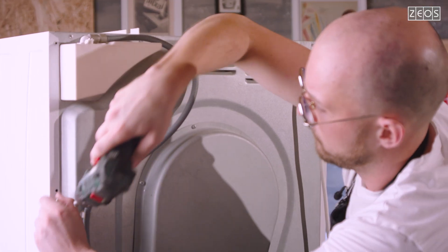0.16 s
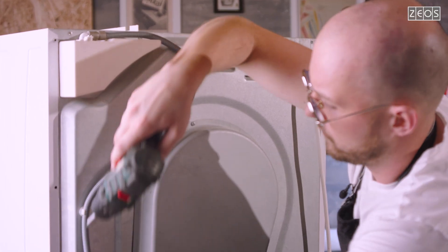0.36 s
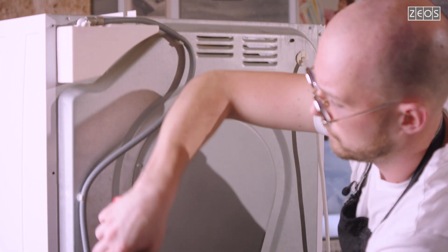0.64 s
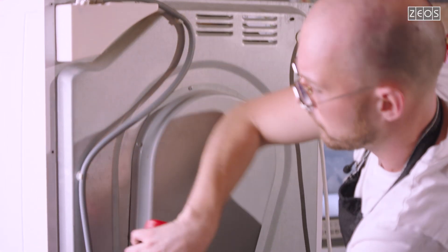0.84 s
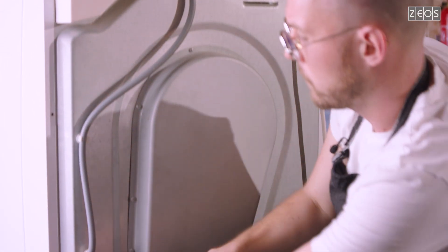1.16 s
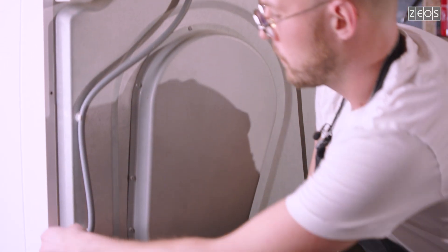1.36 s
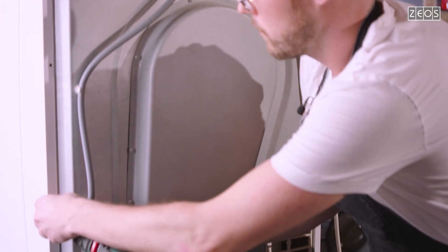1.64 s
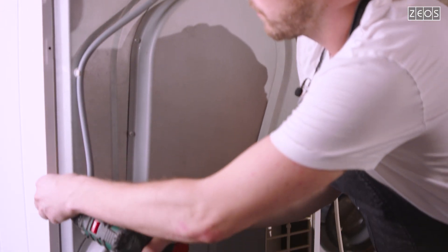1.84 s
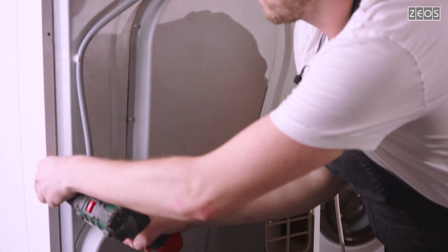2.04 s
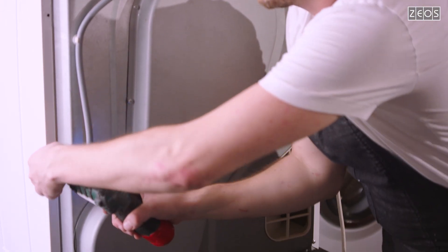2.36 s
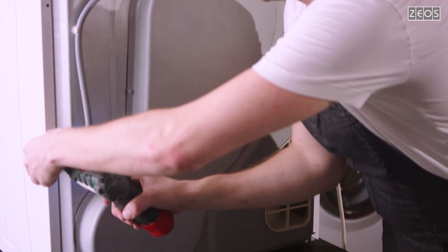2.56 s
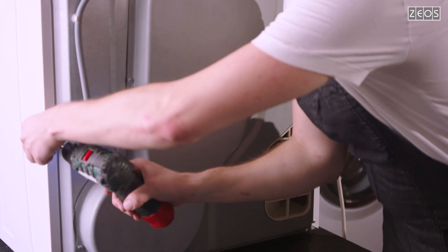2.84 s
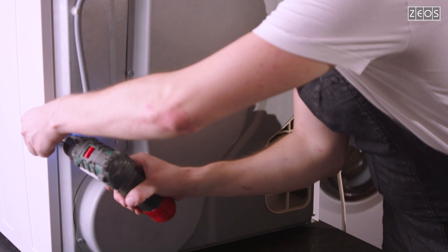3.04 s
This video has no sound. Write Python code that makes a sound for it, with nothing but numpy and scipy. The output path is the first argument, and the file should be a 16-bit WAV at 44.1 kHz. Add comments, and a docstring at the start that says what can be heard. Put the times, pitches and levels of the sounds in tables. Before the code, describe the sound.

A cordless drill is already whirring, gritty and bright, and dies away by about 0.3 s. Quiet room air and faint hum remain, with soft rustle, sparse ticks and a sharp ringing metallic click at 1.2 s. Light panel knocks and clicks follow from 1.4 to 2.2 s. At 2.25 s a hard clunk and thin high whine start the drill; it dips, then runs with rising gear whirr and panel rattle until cut off at 3.2 s.

```python
"""In a workshop, a cordless drill backs screws out of a sheet-steel appliance panel: one burst dies away, the tool is
moved and seated with clicks and knocks, then it whines, bites and runs. Motor, air and rustle are coloured noise;
gear teeth, whine, whistle and hum are sine waves; the panel is a set of ringing modes; clicks are short noise bursts.
The clicks and the rougher whine get a near echo and a room tail. Both channels carry the same mono sound."""
import sys
import numpy as np
from scipy import signal
from scipy.fft import rfft, irfft, next_fast_len
from scipy.io import wavfile
from scipy.ndimage import uniform_filter1d, map_coordinates

SR = 44100
rng = np.random.default_rng(int(sys.argv[2]) if len(sys.argv) > 2 else 0)


def store_wav(level_fs):
    """Save 16-bit WAV to argv[1]."""
    pcm = np.round(np.clip(np.atleast_2d(level_fs), -1, 1) * 32767)
    wavfile.write(sys.argv[1], SR, pcm.T.astype(np.int16))


def ratio_of_db(decibels):
    """Turn decibels (scalar or array-like) into linear amplitude factors; 0 dB maps to 1."""
    return 10 ** (np.asarray(decibels, float) / 20)


N = 141120
T = np.arange(N) / SR  # time of each sample [s]

# All noise colours below are relative: the noise is scaled to its own level afterwards.
# motor bursts, one list each: (time [s], relative level of gear and brush noise [dB], treble boost [dB])
MOTOR_BURSTS = [
    [(0.0, -31.5, 2), (0.092, -33, -3), (0.228, -43.5, -7.5), (0.306, -55.5, -13), (0.45, -69, -23)],
    [(2.2, -64, 9), (2.216, -56.5, -1), (2.264, -31, -5), (2.316, -34.5, -5.5), (2.342, -33.5, -3),
     (2.47, -39, -8.5), (2.534, -32, -0.5), (2.684, -31.5, 3), (2.698, -31.5, 1.5), (2.988, -33, 2.5),
     (3.2, -35, 5)],
]
# gear teeth meeting: (time [s], teeth per second [Hz], relative level [dB], tilt [dB per multiple])
TOOTH_MESH = [(2.48, 880, -70, 3), (2.53, 980, -52, 3), (2.6, 1065, -47, 4.5), (2.63, 1115, -48, 3.5),
              (2.67, 1190, -45, 3.5), (2.71, 1210, -56, 3), (2.94, 1212, -54, 2), (2.98, 1212, -42, -3),
              (3.1, 1215, -43, -3), (3.2, 1220, -54, 0)]
# multiples of the tooth rate: (multiple, level before the tilt [dB])
TOOTH_MULTIPLES = [(1, -14), (2, -1), (3, -3), (4, -4)]
# multiples of the shaft's turning rate: (multiple, level against the gear noise [dB])
SHAFT_MULTIPLES = [(1, -18), (2, -13), (3, -15)]
# resonances of the drill housing: (pitch [Hz], width [Hz], relative level [dB])
HOUSING_RESONANCES = [(2144, 38, 7), (3320, 35, -8), (3620, 57, -22), (4550, 48, 17), (4720, 84, -4),
                      (5730, 370, 15.5), (6300, 43, -20), (6980, 105, 9), (8150, 54, 8)]
# colour of the gear noise: (frequency [Hz], level per Hz [dB])
GEAR_COLOUR = [(410, -42), (700, -6), (958, -6), (1640, -6), (2160, -4), (2660, -4.5), (3070, -2),
               (3840, -3), (6400, -2.5), (13000, -20), (16000, -27.5)]

# the panel shaken by tool and hands: (time [s], relative level [dB], low part over high part [dB])
PANEL_SHAKES = [
    [(0.0, -34.5, 6), (0.09, -34, -1), (0.192, -48.5, 3.5), (0.476, -63, 0), (0.5, -62, -8)],
    [(1.435, -59, 2), (1.465, -46.5, -7), (1.599, -60.5, 6), (1.623, -63, 5), (1.7, -59, 0)],
    [(1.74, -68, 1), (1.75, -59, 0), (1.808, -57, 11.5), (1.876, -62.5, 22.5), (1.892, -49, 10),
     (2.154, -50, -0.5), (2.172, -43.5, 3.5), (2.234, -44.5, 6), (2.245, -35, -3)],
    [(2.275, -18, 1), (2.293, -27.5, -3.5), (2.451, -35.5, 6.5), (2.521, -33.5, -5), (3.047, -30, -1.5),
     (3.059, -39, -10), (3.085, -27.5, 1), (3.155, -35, 4), (3.2, -27, -3)],
]
# ringing modes of the panel: (pitch [Hz], width [Hz], relative level [dB])
PANEL_MODES = [(109, 12, -12.5), (158.1, 13.2, -2), (205, 15.4, 1.5), (275.7, 40, -5.5),
               (363.3, 18.8, -3.5), (400, 20, -3.5), (447, 32, -3.5), (577.2, 29, -3), (665.7, 21.8, -4),
               (803, 67, -10), (1035.4, 26, -9.5), (1256, 40, -14)]
# colour of the panel's duller noise: (frequency [Hz], level per Hz [dB])
PANEL_COLOUR = [(15, -56), (25, -4.5), (202, -10.5), (316, -6.5), (368, 0.5), (659, -11), (718, -23),
                (1500, -15.5), (1950, -52), (3300, -120)]
# the running bit favours some modes: (time [s], favoured pitch [Hz], boost [dB])
FAVOURED_MODES = [(2.47, 670, -4), (2.52, 674, 11), (2.63, 670, 7.5), (2.66, 377, 10.5), (2.92, 380, 6),
                  (3.0, 640, 1), (3.05, 625, 3.5)]
# knocks on the panel: (time [s], relative peak [dB], centre of the modes struck [Hz])
PANEL_KNOCKS = [(0.072, -24, 184), (0.837, -37, 660), (1.435, -38, 210), (1.459, -36, 205),
                (1.463, -37, 450), (1.789, -39.5, 200), (1.795, -38.5, 586), (1.885, -30.5, 378),
                (1.929, -34, 600), (1.968, -31, 205), (2.028, -40, 600), (2.056, -35, 810),
                (2.082, -36, 420), (2.168, -27, 353), (2.247, -18, 237), (2.259, -5, 590),
                (2.312, -17, 150), (2.452, -25, 385), (3.075, -18, 198)]

# colour of the room air: (frequency [Hz], level per Hz [dB])
AIR_COLOUR = [(12, -16), (20, -3), (116, -9.5), (357, -9.5), (624, -13), (825, -18.5), (1090, -22.5),
              (1190, -23), (1570, -23), (2670, -27.5), (16000, -36)]
# mains hum: (pitch [Hz], average level [dB])
MAINS_HUM = [(50, -67), (100, -73.5), (200, -76)]
# clicks of bit, chuck and screw:
# (time [s], relative peak [dB], main pitch [Hz], broad crack [dB], time for the decay to reach -20 dB [s])
TOOL_CLICKS = [(0.08, -23, 14500, 8, 0.0057), (0.8397, -37, 1520, -16, 0.0054),
               (0.846, -30.5, 7160, -7, 0.0035), (0.9587, -33.5, 2140, 2, 0.0039),
               (1.078, -29.5, 4970, 10, 0.0038), (1.2331, -11, 4550, 2, 0.0037),
               (1.4328, -35, 1574, 1, 0.0025), (1.627, -42.5, 6900, 6, 0.005), (1.929, -37, 1820, 2, 0.011),
               (1.988, -50, 1960, 5, 0.0034), (2.025, -27, 2290, 10, 0.0074),
               (2.162, -35.5, 2540, -6, 0.0048), (2.2618, -14.5, 1800, -6, 0.0068)]
# colour of the broad crack in a click: (frequency [Hz], level [dB])
CRACK_COLOUR = [(240, -46), (400, -15), (2250, 0.5), (3990, -5), (4580, -0.5), (5780, -9), (7400, -5.5),
                (10400, -16), (11800, -14.5), (16000, -22)]
# dull far thuds: (time [s], relative level [dB], pitch [Hz])
FAR_THUDS = [(0.613, -45, 102), (1.04, -44.5, 93)]
# cloth and hands rustle, one list per spell: (time [s], level [dB])
RUSTLE_SPELLS = [
    [(0.74, -71), (0.848, -65.5), (0.972, -55.5), (1.178, -53), (1.23, -67)],
    [(1.436, -45), (1.582, -69.5), (1.75, -85)],
    [(1.92, -72), (1.978, -56), (2.104, -61), (2.2, -58)],
]
# colour of the rustle: (frequency [Hz], level per Hz [dB])
CLOTH_COLOUR = [(180, -36), (300, -7), (418, -5), (455, -4), (1970, -7), (3700, -13.5), (5340, -11.5),
                (16000, -25.5)]
# the hardest click sets a steel part ringing: (time [s], level [dB])
STEEL_START = (1.236, -44)
# a faint high whistle: (time [s], pitch [Hz], level [dB])
WHISTLE_PATH = [(1.36, 11550, -95), (1.39, 11450, -77), (1.43, 11350, -77.5), (1.49, 11300, -72.5),
                (1.52, 11700, -74), (1.55, 11100, -82), (1.58, 9600, -73), (1.62, 8300, -89)]
# rough speed-control whine, one list per spell: (time [s], pitch [Hz], relative level [dB])
ROUGH_WHINE = [
    [(2.198, 6580, -53), (2.216, 5900, -38), (2.23, 5680, -34), (2.244, 5620, -26), (2.252, 5655, -38)],
    [(2.265, 6330, -38), (2.283, 6050, -39), (2.305, 6490, -47), (2.317, 6020, -38), (2.35, 5930, -48)],
    [(2.463, 5630, -39), (2.473, 5870, -35.5), (2.493, 5670, -31), (2.55, 5668, -30.5), (2.562, 5770, -40)],
    [(2.705, 5949, -43), (2.711, 5825, -34), (2.723, 5630, -30.5), (2.743, 5820, -34), (2.76, 5820, -44)],
]
# steadier spells of the whine: (time [s], pitch [Hz], level [dB])
STEADY_WHINE = [
    [(2.4, 7250, -52), (2.41, 7230, -45), (2.44, 7050, -48), (2.462, 6300, -48)],
    [(2.865, 6290, -39), (2.91, 6340, -38.5), (2.995, 6360, -39)],
    [(3.15, 6260, -37), (3.2, 6320, -38)],
]
# how long the room rings: (frequency [Hz], time to fall 60 dB [s])
ROOM_DECAY = [(200, 1), (1500, 0.51), (4800, 0.35), (9000, 0.43), (15000, 0.45)]

TEETH = 6  # on the motor pinion
SHAFT_DEPTH = 0.25  # pulsing once a turn, as a share of the noise
RATTLE_PER_S, RATTLE_DB = 900, -9  # grit in the gear noise
MESH_BLUR, MOTOR_UNEVEN_DB = 0.0025, 0.7  # pitch blur as a share, size of random level changes
HOUSING_DB = -3.5  # resonances against the plain gear noise
BODY_DB, SPLIT_HZ = -9, 260  # dull panel noise, border between low and high part
FAVOURED_OCTAVES = 0.18  # how far from the favoured pitch the boost spreads
LURCH_DB, MODE_SCATTER_DB = 1.2, 2  # random changes of shaking, of each struck mode
KNOCK_DAMPING = 0.75  # how fast a struck mode dies, against what its width says
SPREAD_OCTAVES, SPREAD_PER_DB = 0.95, 0.014  # reach at 0 dB; softer knocks reach fewer modes
THUD_S = 0.083  # time for the decay to reach -60 dB
AIR_DB = -57
CLICK_Q = 4  # higher means a narrower pitch
RUSTLE_UNEVEN_DB = 1.2
SCRAPES_PER_S, SCRAPE_DB = 250, -7  # tiny ticks in the rustle
STEEL_HZ, STEEL_WIDTH_HZ, STEEL_T60_S = 4800, 450, 0.4
OCTAVE_DB, ROUGH_WAVER_HZ, ROUGH_FLUTTER_DB = -31, 70, 3.5
STEADY_WAVER_HZ, STEADY_FLUTTER_DB = 12, 2
ECHO_S, ECHO_DB, ROOM_DELAY_S = 0.0047, -3, 0.009
CLICK_ROOM_DB, WHINE_ROOM_DB = -6.5, -14  # how loud the room tail is
TOP_HZ = 15850  # nothing is kept above this


def unit(x):
    """Scale to an average (rms) level of 1."""
    return x / np.sqrt(np.mean(x ** 2) + 1e-20)


def along(points, hz):
    """Read a (frequency, value) curve, with frequency on a log axis."""
    f, v = np.transpose(points)
    return np.interp(np.log(hz + 1), np.log(f + 1), v)


def spells(tables, fade_db_per_s=4000):
    """Turn tables into curves over time, plus a gain that falls away quickly outside each table."""
    rows = np.concatenate(tables)
    away = np.min([np.maximum(np.maximum(t[0][0] - T, T - t[-1][0]), 0) for t in tables], axis=0)
    curves = [np.interp(T, rows[:, 0], column) for column in rows.T[1:]]
    return curves, ratio_of_db(-fade_db_per_s * away)


def wobble(rate):
    """A smooth random curve through `rate` random points a second."""
    return map_coordinates(rng.standard_normal(int(N * rate / SR) + 4), [T * rate])


def filtered(x, response):
    """Multiply the spectrum of x by a response that depends on frequency."""
    m = next_fast_len(len(x) + SR // 2)
    return irfft(rfft(x, m) * response(np.fft.rfftfreq(m, 1 / SR)), m)[:len(x)]


def resonances(peaks):
    """Response of parts that ring at (pitch, width, level), with alternating signs."""
    def response(f):
        return sum((-1) ** k * ratio_of_db(db) * 1j * f * width / (hz * hz - f * f + 1j * f * width)
                   for k, (hz, width, db) in enumerate(peaks))
    return response


def noise(colour, patchy_db, source=None):
    """Coloured noise of rms 1, uneven in patches of time and frequency."""
    source = rng.standard_normal(N) if source is None else source
    z = signal.stft(source, nperseg=512)[2]
    patches = uniform_filter1d(uniform_filter1d(rng.standard_normal(z.shape), 5, 0), 8, 1)
    patchy = signal.istft(z * ratio_of_db(patchy_db * unit(patches)), nperseg=512)[1][:N]
    return unit(filtered(patchy, lambda hz: ratio_of_db(along(colour, hz))))


def ticks(per_second):
    """Single-sample ticks of random size at random moments."""
    return rng.standard_normal(N) * (rng.random(N) < per_second / SR)


def tone(hz, flutter_db):
    """Phase and fluttering gain of an unsteady tone."""
    return 2 * np.pi * np.cumsum(hz) / SR, np.sqrt(2) * ratio_of_db(flutter_db * wobble(120))


def room(x, into_room, wet_db):
    """One strong near echo, then a tail in which each frequency dies at its own speed."""
    hz, t, z = signal.stft(rng.standard_normal(SR // 2), SR, nperseg=256)
    decay = ratio_of_db(-60 * t / along(ROOM_DECAY, hz)[:, None])
    tail = signal.istft(z * decay, SR, nperseg=256)[1]
    wet = signal.fftconvolve(into_room, tail / np.linalg.norm(tail))[:len(x)]

    def late(v, s):
        return np.pad(v, (round(s * SR), 0))[:len(x)]
    return x + ratio_of_db(ECHO_DB) * late(x, ECHO_S) + ratio_of_db(wet_db) * late(wet, ROOM_DELAY_S)


def motor():
    """Gritty gear noise pulses with the shaft and rings in the housing; gear teeth add blurred tones."""
    (db, treble_db), on = spells(MOTOR_BURSTS, 770)
    (hz, teeth_db, tilt_db), meshing = spells([TOOTH_MESH])
    phase, gain = tone(hz * (1 + MESH_BLUR * wobble(90)), 3.9)
    turn = phase / TEETH
    grit = unit(ticks(RATTLE_PER_S))
    drive = (rng.standard_normal(N) + ratio_of_db(RATTLE_DB) * grit) * (1 + SHAFT_DEPTH * np.cos(turn))
    plain = noise(GEAR_COLOUR, MOTOR_UNEVEN_DB, drive)
    ringing = unit(filtered(plain, resonances(HOUSING_RESONANCES)))
    body = unit(plain + ratio_of_db(HOUSING_DB) * ringing)
    # the treble boost acts on what a soft filter at 5500 Hz leaves out
    low = filtered(body, lambda f: 1 / (1 + (f / 5500) ** 4))
    body = low + ratio_of_db(treble_db) * (body - low)
    teeth = sum(ratio_of_db(d + (k - 1) * tilt_db + 2.7 * wobble(29.76)) * np.sin(k * phase)
                for k, d in TOOTH_MULTIPLES)
    shaft = sum(ratio_of_db(d + 5.0 * wobble(25.01)) * np.sin(k * turn) for k, d in SHAFT_MULTIPLES)
    level = on * ratio_of_db(db + 2.5 + MOTOR_UNEVEN_DB * wobble(25.0))
    return level * (body + meshing * shaft) + meshing * ratio_of_db(teeth_db) * gain * teeth


def panel_shaking():
    """Rough contact drives the sheet's modes and a duller noise with random force."""
    (db, low_db), on = spells(PANEL_SHAKES, 590)
    drive = on * ratio_of_db(db + LURCH_DB * wobble(45))
    norm = np.std(filtered(rng.standard_normal(N), resonances(PANEL_MODES)))
    (near_hz, boost_db), _ = spells([FAVOURED_MODES])
    rough = drive * rng.standard_normal(N)
    modes = np.zeros(N)
    for k, mode in enumerate(PANEL_MODES):
        nearness = np.exp(-(np.log2(mode[0] / near_hz) / FAVOURED_OCTAVES) ** 2)
        modes += (-1) ** k * filtered(rough * ratio_of_db(boost_db * nearness), resonances([mode]))
    shaken = modes / norm + ratio_of_db(BODY_DB) * drive * noise(PANEL_COLOUR, 3.9)
    low = filtered(shaken, lambda f: 1 / (1 + (f / SPLIT_HZ) ** 6))
    return 0.83 * (shaken - low + ratio_of_db(low_db) * low)


def air():
    """Room air is soft, slightly uneven noise."""
    return ratio_of_db(AIR_DB + 0.27 * wobble(6.5)) * noise(AIR_COLOUR, 1.4)


def hum():
    """Mains hum is a few low sine waves whose levels drift."""
    return sum(ratio_of_db(d + 1.5 * wobble(6.9)) * np.sqrt(2) * np.sin(2 * np.pi * hz * T) for hz, d in MAINS_HUM)


def knocks():
    """Each knock sets off the panel modes near its centre; wide modes die sooner."""
    out, t = np.zeros(N + SR), np.arange(SR // 4) / SR
    for s, peak_db, centre_hz in PANEL_KNOCKS:
        octaves = SPREAD_OCTAVES + SPREAD_PER_DB * peak_db
        x = np.zeros(len(t))
        for k, (hz, width, d) in enumerate(PANEL_MODES):
            off_centre_db = 5.0 * (np.log2(hz / centre_hz) / octaves) ** 2
            strength = width * ratio_of_db(d + rng.normal(0, MODE_SCATTER_DB) - off_centre_db)
            decay = np.exp(-np.pi * width * KNOCK_DAMPING * t)
            x += (-1) ** k * strength * decay * np.sin(2 * np.pi * hz * t + rng.normal(0, 0.8))
        x *= 1 - np.exp(-t / 0.0026)  # soft start
        out[round(s * SR):][:len(t)] += ratio_of_db(peak_db - 5.0) * x / np.abs(x).max()
    return out[:N]


def clicks():
    """Each click is a short noise burst around its own pitch over a broad crack, with echo and room."""
    out, t = np.zeros(N + SR), np.arange(SR // 2) / SR
    for s, db, hz, broad_db, length in TOOL_CLICKS:
        def colour(f):
            return resonances([(hz, hz / CLICK_Q, 0)])(f) + ratio_of_db(broad_db + along(CRACK_COLOUR, f))
        envelope = ratio_of_db(-60 * t / (3 * length)) * (1 - np.exp(-t / 0.00014))
        burst = filtered(rng.standard_normal(len(t)) * envelope, colour)
        burst = burst / np.abs(burst).max()
        # a single pulse of the same colour and energy feeds the room tail
        pulse = np.roll(filtered(np.roll(1. * (t == 0), 200), colour), -100)
        pulse = pulse * np.linalg.norm(burst) / np.linalg.norm(pulse)
        out[round(s * SR):][:len(t)] += ratio_of_db(db - 2.0) * room(burst, pulse, CLICK_ROOM_DB)
    return out[:N]


def thuds():
    """A far thud is a low sine wave with a soft start and a quick decay."""
    out, t = np.zeros(N + SR), np.arange(SR // 4) / SR
    for s, db, hz in FAR_THUDS:
        envelope = ratio_of_db(db - 60 * t / THUD_S) * (1 - np.exp(-t / 0.0057))
        out[round(s * SR):][:len(t)] += 1.3 * envelope * np.sin(2 * np.pi * hz * t)
    return out[:N]


def rustle():
    """Cloth and hands rub: coloured noise with tiny scraping ticks."""
    (db,), on = spells(RUSTLE_SPELLS)
    rubbing = rng.standard_normal(N) + ratio_of_db(SCRAPE_DB) * unit(ticks(SCRAPES_PER_S))
    level = on * ratio_of_db(db + RUSTLE_UNEVEN_DB * wobble(29.96))
    return level * noise(CLOTH_COLOUR, RUSTLE_UNEVEN_DB, rubbing)


def steel():
    """A struck steel part rings: a narrow band of noise that dies away."""
    s, db = STEEL_START
    peak = resonances([(STEEL_HZ, STEEL_WIDTH_HZ, 0)])
    ring = unit(filtered(rng.standard_normal(N), lambda f: peak(f) ** 2))
    return (T > s) * ratio_of_db(db - 60 * np.maximum(T - s, 0) / STEEL_T60_S) * ring


def whistle():
    """A thin whistle is one fluttering sine wave that ends by falling in pitch."""
    (hz, db), on = spells([WHISTLE_PATH])
    phase, gain = tone(hz, 2.2)
    return on * ratio_of_db(db) * gain * np.sin(phase)


def whine():
    """The trigger electronics sing through the windings, in rough spells and in steadier ones."""
    (hz, db), on = spells(ROUGH_WHINE)
    phase, gain = tone(hz + ROUGH_WAVER_HZ * wobble(150), ROUGH_FLUTTER_DB)
    rough = on * ratio_of_db(db) * gain * (np.sin(phase) + ratio_of_db(OCTAVE_DB) * np.sin(2 * phase))
    (hz, db), on = spells(STEADY_WHINE)
    phase, gain = tone(hz + STEADY_WAVER_HZ * wobble(150), STEADY_FLUTTER_DB)
    steady = on * ratio_of_db(db) * gain * np.sin(phase)
    return ratio_of_db(-2) * room(rough, rough, WHINE_ROOM_DB) + steady


def scene():
    """Add up all the sounds and put the same sum in both channels."""
    tool = motor() + whine() + whistle()
    contact = panel_shaking() + knocks() + clicks() + thuds() + steel()
    mono = tool + contact + rustle() + air() + hum()
    return np.array([mono, mono])


def band_limit(x):
    """A steep low-pass at the top of the band."""
    return signal.sosfilt(signal.butter(12, 16450, fs=SR, output="sos"), x)


def record(dry):
    """Remove everything above the top frequency and finish the mix."""
    mix = np.array([filtered(channel, lambda hz: hz < TOP_HZ) for channel in dry])
    return band_limit(mix)


dry = scene()
out = record(dry)
store_wav(out)
```